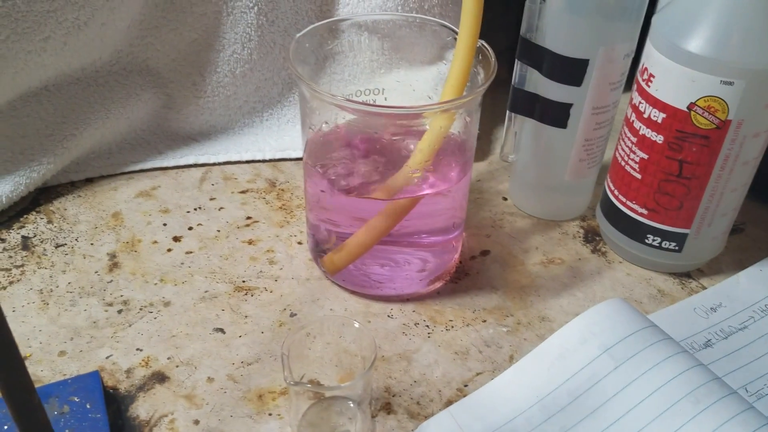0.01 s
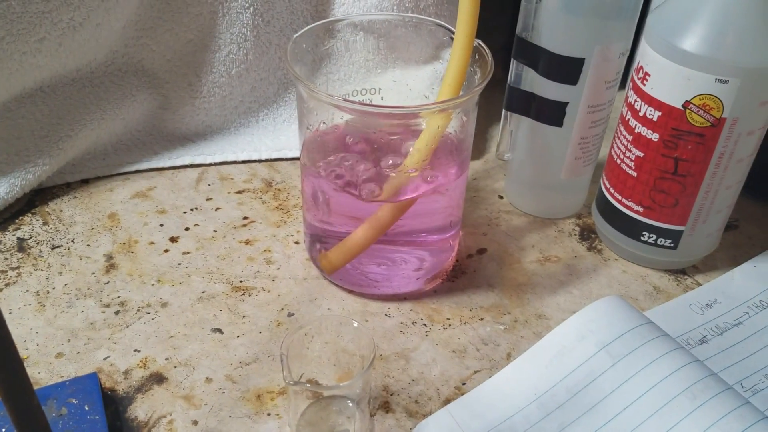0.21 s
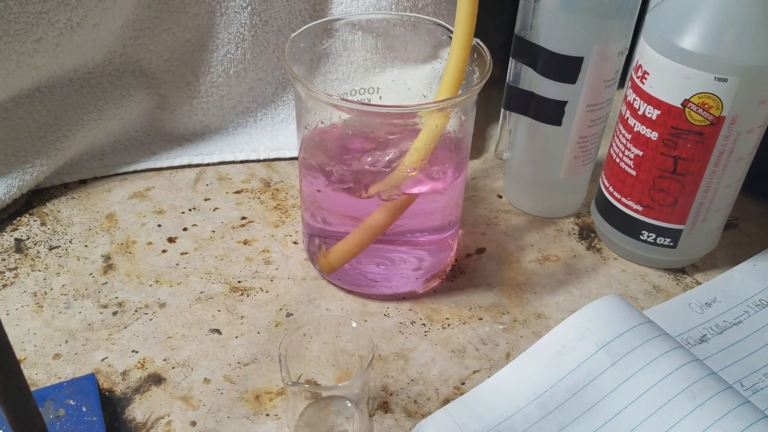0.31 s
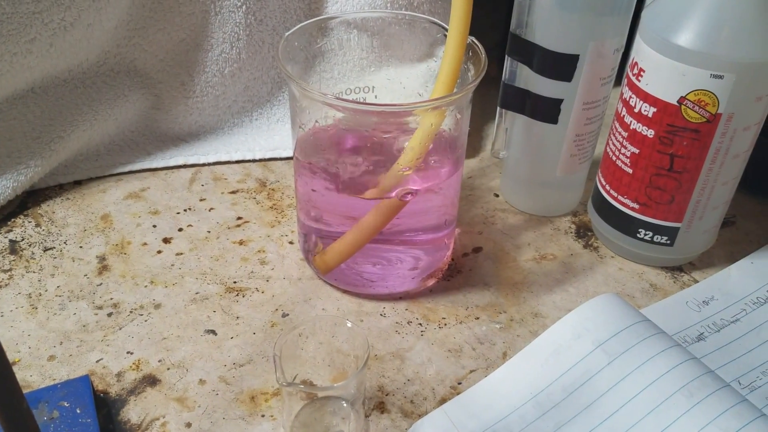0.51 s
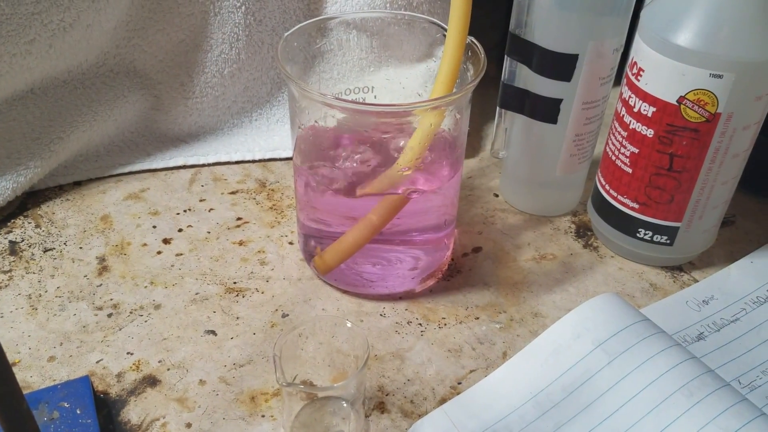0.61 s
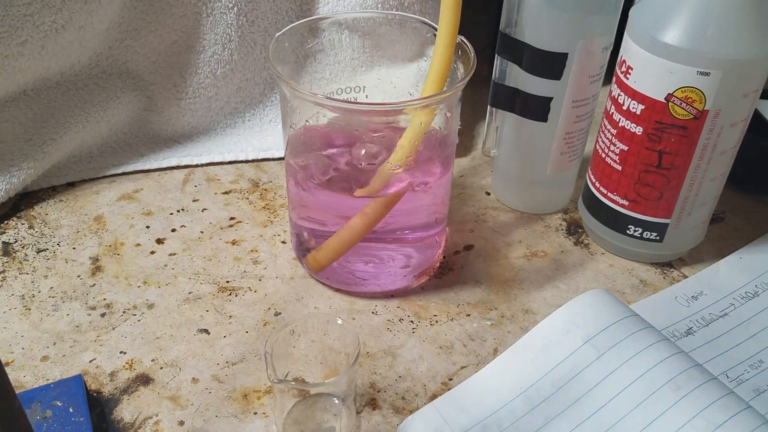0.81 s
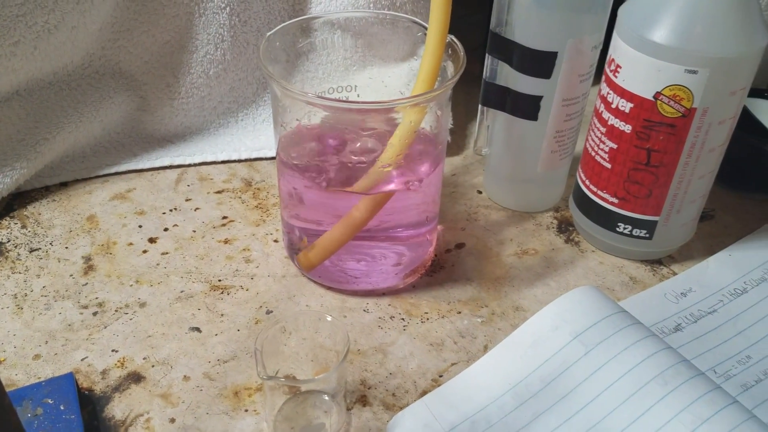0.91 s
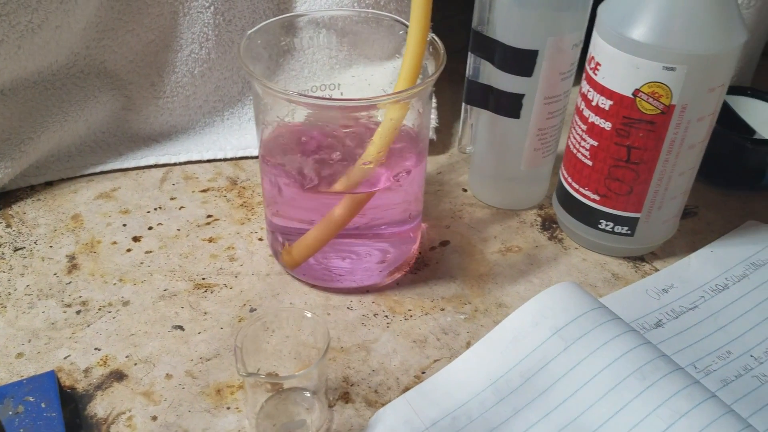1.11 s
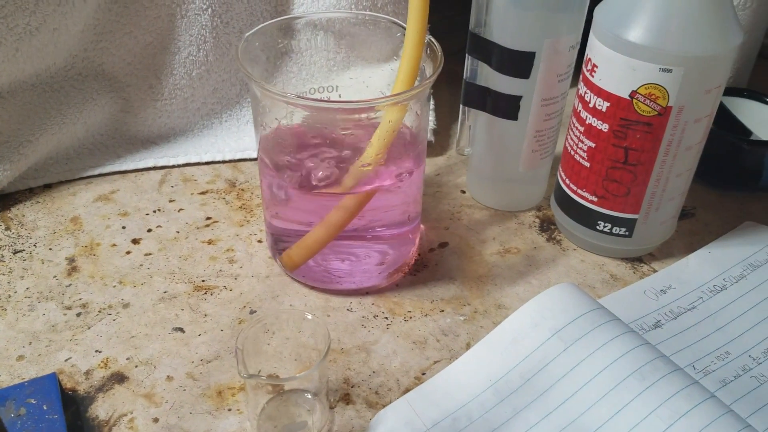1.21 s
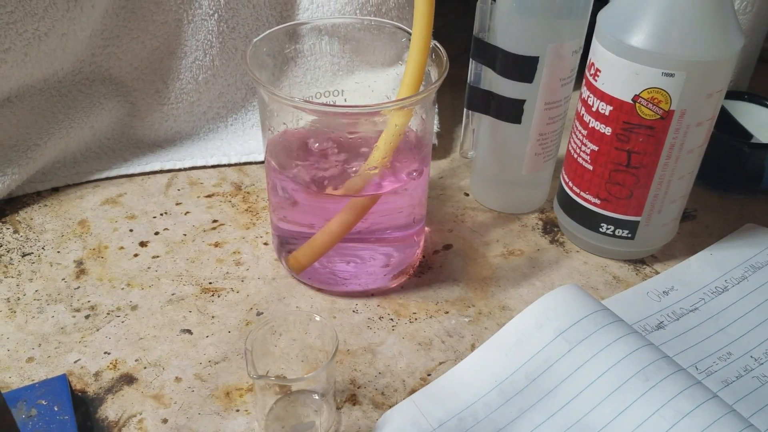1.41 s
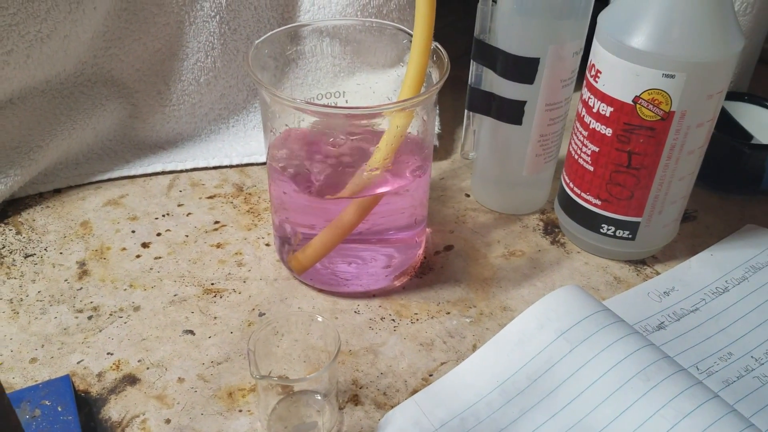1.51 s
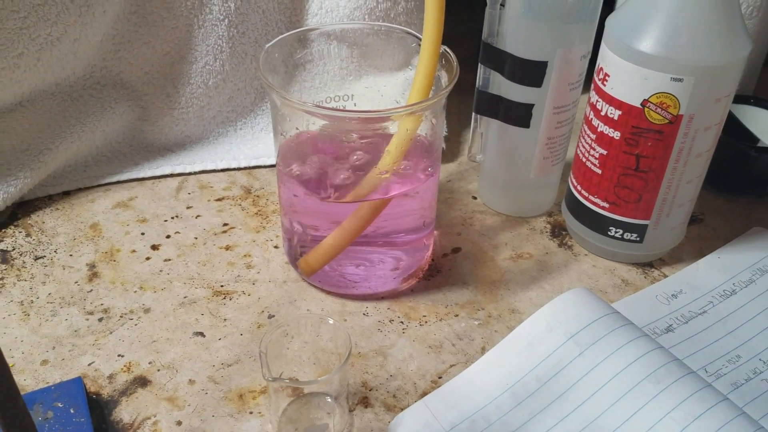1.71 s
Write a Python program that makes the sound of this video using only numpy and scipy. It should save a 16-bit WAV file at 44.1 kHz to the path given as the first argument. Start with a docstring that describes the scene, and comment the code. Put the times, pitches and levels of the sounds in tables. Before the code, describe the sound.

Bubbles blub rapidly and irregularly through liquid in a glass beaker, small and low with rising pitch. A loud knock on the bench comes early, then fainter bumps and crisp ticks; close stereo microphones, small quiet lab.

```python
"""Gas bubbles through liquid in a glass beaker: each leaves a rubber tube as a damped sine of rising pitch,
with a splash of noise and an answering beaker tone; some bubbles reach the surface as short upward sweeps.
Films burst as narrow-band noise ticks and foam collapses in grainy noise. Knocks on the bench, softer
later, sum damped modes, a thud and noise. A soft noise rush fades within the first second, leaving the
faint low-heavy air noise of a small lab."""
import sys
import numpy as np
from scipy import signal
from scipy.fft import rfft, irfft, next_fast_len
from scipy.io import wavfile
from scipy.ndimage import uniform_filter1d

SR = 44100
rng = np.random.default_rng(int(sys.argv[2]) if len(sys.argv) > 2 else 0)


def transcribe(signal):
    """Save signal, clipped to [-1, 1], as a 16-bit WAV file at the path in sys.argv[1]."""
    frames = np.atleast_2d(signal).T
    limited = np.clip(frames, -1, 1)
    pcm = np.round(limited * 32767).astype(np.int16)
    wavfile.write(sys.argv[1], SR, pcm)


N = 79380  # samples, 1.8 s
T = np.arange(N) / SR  # s


def amp(db):
    """Level to amplitude: 20 dB is a factor of ten."""
    return 10 ** (np.asarray(db) / 20)


def unit(x):
    """Normalisation to an rms of 1."""
    return x / np.sqrt(np.mean(x ** 2) + 1e-20)


def along(points, hz):
    """Interpolation of (f/Hz, value) points on a logarithmic frequency axis."""
    f, v = np.transpose(points)
    return np.interp(np.log(hz + 1), np.log(f + 1), v)


def filtered(x, response):
    """Linear filtering: the spectrum of x times a response of frequency."""
    padded = next_fast_len(N + SR // 2)
    hz = np.fft.rfftfreq(padded, 1 / SR)
    return irfft(rfft(x, padded) * response(hz), padded)[..., :N]


def noise(spectrum):
    """Stereo noise of rms 1, shaped by a spectrum; the mid-side ratio sets the channel correlation."""
    # Correlation of left and right: f/Hz, coefficient (-1 to 1)
    alike = [(60, 0.53), (200, 0.74), (500, 0.9), (1000, 0.042), (2000, -0.13), (4000, -0.069),
             (10000, 0.014)]

    def mid_side_response(hz):
        angle = np.arccos(np.clip(along(alike, hz), -1, 1)) / 2
        return amp(along(spectrum, hz)) * [np.cos(angle), np.sin(angle)]

    mid, side = filtered(rng.standard_normal((2, N)), mid_side_response)
    return unit(np.array([mid + side, mid - side]))


def since(s):
    """Time elapsed since s in seconds, zero before."""
    return np.maximum(T - s, 0)


def fade(s, rise, t60, hold=0):
    """Exponential onset at s and exponential decay, 60 dB per t60, that begins after the hold."""
    onset = 1 - np.exp(-since(s) / rise)
    decay = np.exp(-np.log(1000) * since(s + hold) / t60)
    return onset * decay


def room(x, wet_db):
    """Reverberation: the sound plus its convolution with a fresh, frequency-dependent noise decay."""
    # Reverberation time of the small room: f/Hz, t60/s
    room_t60 = [(150, 0.26), (500, 0.24), (3000, .22), (12000, 0.17)]
    delay_s = 0.0039  # the tail is silent up to here
    white = noise([(20, 0), (20000, 0)])[:, :SR // 3]
    hz, t, bands = signal.stft(white, SR, nperseg=256)
    decay = np.exp(-np.log(1000) * t / along(room_t60, hz)[:, None])
    tail = signal.istft(bands * decay, SR, nperseg=256)[1]
    tail = tail * (T[:tail.shape[1]] > delay_s)
    tail = tail / np.linalg.norm(tail[0])
    return x + amp(wet_db) * signal.fftconvolve(np.atleast_2d(x), tail, axes=1)[:, :N]


def placed(x, lead_s):
    """Interaural-style time difference: a mono sound at two microphones, the left one earlier by lead_s."""
    channel_sign = np.array([[1], [-1]])
    return filtered(x, lambda hz: np.exp(1j * np.pi * hz * lead_s * channel_sign))


def background():
    """Stationary broadband noise forms the lab's air; noise under a falling envelope forms the soft rush."""
    # Envelope of the rush: t/s, level/dB
    rush_level = [(0, -43), (.2, -44), (.38, -47.5), (.5, -47.5), (.58, -56), (.72, -64.5), (.9, -85)]
    # Spectral shape of the rush: f/Hz, relative level/dB
    rush_spectrum = [(60, -26), (150, -27), (240, -21), (380, -2), (600, -3.5), (900, -11.5), (1200, -5),
                     (2000, -17), (3000, -21.5), (4400, -17.5), (6000, -27), (15500, -35.5)]
    # Spectral shape of the air: f/Hz, relative level/dB
    air_spectrum = [(25, -24), (60, 2), (100, 6), (150, -9), (230, -2.5), (420, 2.5), (750, 4.5), (1100, 2),
                    (1500, -5.5), (2200, -2.5), (3300, -10), (5000, -15.5), (8000, -20), (15500, -15.5)]
    air_db = -57.5
    rush = amp(np.interp(T, *np.transpose(rush_level))) * noise(rush_spectrum)
    return rush + amp(air_db) * noise(air_spectrum)


def knocks():
    """Modal excitation: each blow rings the damped bench modes, with a low thud and contact noise."""
    # Blows on the bench: t/s, level/dB, thud level/dB, thud hold/s
    blows = [(0.2162, -23.5, -44, 0.039), (.2855, -33.5, -50.5, 0.035), (0.621, -42.5, -44.5, 0.028),
             (1.329, -46, -49.5, 0.012), (1.664, -52, -51, .025), (1.761, -52, -47.5, 0.027)]
    # Modes of the bench: f/Hz, relative level/dB, t60/s
    modes = [(168, -18.5, 0.15), (221, -2, 0.099), (291.6, -6.5, 0.071), (367.8, -2.5, .16),
             (493.7, -15.5, 0.45), (541, -14, 0.16), (614.4, -10, 0.18), (713, -12.5, 0.13),
             (781, -8, 0.076), (863, -7, 0.1), (1102, -11, .1)]
    # Spectral shape of the blow's longer noise: f/Hz, relative level/dB
    body_spectrum = [(40, -45), (130, -31), (220, -4.5), (370, -15), (450, -8), (600, -7.5), (850, -9),
                     (1300, -20), (1700, -27), (3000, -41), (8000, -66)]
    # Spectral shape of the shorter crack: f/Hz, relative level/dB
    crack_spectrum = [(100, -12), (270, -5), (850, 4), (1400, -18.5), (2100, -6.5), (3000, -25),
                      (8000, -41)]
    body_db, body_rise_s, body_t60 = -3, 0.00073, 0.13
    crack_db, crack_rise_s, crack_t60 = -1.5, 0.00037, 0.037
    thud_hz, thud_rise_s, thud_t60 = 108, .014, .06
    bench_rise_s, lead_s, wet_db = 0.0036, 0.000084, -7

    rings, contact = np.zeros(N), np.zeros((2, N))
    body_noise, crack_noise = noise(body_spectrum), noise(crack_spectrum)
    for s, db, thud_db, thud_hold_s in blows:
        for k, (hz, mode_db, t60) in enumerate(modes):
            mode = np.sin(2 * np.pi * hz * since(s)) * fade(s, bench_rise_s, t60)
            rings += (-1) ** k * amp(db) * amp(mode_db) * mode  # neighbours in opposite phase
        thud = np.sin(2 * np.pi * thud_hz * since(s)) * fade(s, thud_rise_s, thud_t60, thud_hold_s)
        rings += amp(thud_db) * thud
        body = amp(body_db) * body_noise * fade(s, body_rise_s, body_t60)
        crack = amp(crack_db) * crack_noise * fade(s, crack_rise_s, crack_t60)
        contact += amp(db) * (body + crack)
    return room(placed(rings, lead_s) + contact, wet_db)


def spatters(grain_db=3.5):
    """Random superposition: foam collapses in noise sprays whose level fluctuates by grain_db rms."""
    # Sprays of collapsing foam: t/s, level/dB, rise/s, t60/s
    sprays = [(0.621, -48.5, .001, .05), (.645, -55, 0.0031, 0.2), (.89, -54.5, 0.0039, 0.14),
              (.974, -43, 0.0018, 0.027), (1.28, -41.5, 0.038, 0.16), (1.329, -55, 0.0028, 0.17),
              (1.53, -53, 0.0011, 0.06), (1.567, -56.5, 0.0047, 0.18), (1.65, -37, 0.0092, 0.062),
              (1.770, -38, 0.00088, 0.019)]
    # Spectral shape of the sprays: f/Hz, relative level/dB
    spray_spectrum = [(300, -1), (900, -1), (2200, 1.5), (3300, -7.5), (4500, -8.5), (7000, -13),
                      (15000, -14.5)]
    level = sum(amp(db) * fade(s, rise, t60) for s, db, rise, t60 in sprays)
    flicker = unit(uniform_filter1d(rng.standard_normal(N), size=40))  # averaged over 0.9 ms
    grains = unit(amp(grain_db * flicker))
    return room(level * grains * noise(spray_spectrum), wet_db=-5)


def ticks():
    """Impulsive resonance: each bursting film is narrow-band noise that decays within milliseconds."""
    # Bursting films: t/s, f/Hz, level/dB, t60/s, left-right level difference/dB
    films = [(0.459, 8200, -52, .015, -4), (0.6227, 7300, -54, 0.0098, 6.5), (0.71, 11400, -57, 0.016, -4),
             (0.8231, 10760, -37.5, 0.013, 4.5), (.9735, 15200, -62, 0.0071, 12),
             (1.134, 12300, -53, .01, -1), (1.189, 8620, -53.5, 0.012, 1.5), (1.439, 9860, -54, 0.048, 2),
             (1.489, 12600, -66, 0.0057, -3), (1.533, 13700, -38.5, 0.0099, 12.5),
             (1.566, 3030, -55, 0.067, 4), (1.6486, 12900, -50.5, .035, 13),
             (1.6816, 9790, -52, 0.0092, -4), (1.7, 11200, -46.5, 0.013, 1),
             (1.7569, 12000, -49, 0.012, 10), (1.7685, 7400, -51, 0.011, -4), (1.784, 5450, -51, .012, 4)]
    width, rise_s, wet_db = 0.19, .0004, -8  # width as a fraction of the centre frequency
    out = np.zeros((2, N))
    for s, hz, db, t60, pan_db in films:
        white = rng.standard_normal((2, N))
        ring = unit(filtered(white, lambda f: (1 + ((f / hz - 1) / width) ** 2) ** -1.5))
        pan = amp([[pan_db / 2], [-pan_db / 2]])
        out += amp(db) * pan * ring * fade(s, rise_s, t60)
    return room(out, wet_db)


def chirps():
    """Frequency modulation: a bubble nearing the surface swells, sweeps upward and stops."""
    # Bubbles reaching the surface: t/s, starting f/Hz, level/dB, length/s
    surfacing = [(.528, 771, -49, 0.033), (.722, 682, -49, 0.024), (0.922, 672, -57, .022),
                 (1.324, 635, -46, 0.014), (1.561, 703, -46.5, 0.026)]
    sweep_octaves, wet_db = 0.598, -9
    out = np.zeros(N)
    for s, hz, db, length in surfacing:
        way = np.minimum(since(s) / length, 1)  # 0 to 1 through the sweep
        pitch = hz * 2 ** (sweep_octaves * way)
        phase = 2 * np.pi * np.cumsum(pitch * (T > s)) / SR
        out += amp(db) * np.sin(phase) * np.sin(np.pi * way)
    return room(out, wet_db)


def bubbles():
    """Volume resonance: each bubble is a damped sine whose pitch climbs as it nears the surface."""
    # Bubbles leaving the tube: t/s, starting f/Hz, level/dB, t60/s, rise/(octaves per s) during one t60
    releases = [(.02, 396, -45, 0.041, 3.4), (.065, 522, -44.5, 0.033, 1.5),
                (.120, 400.5, -41.5, 0.053, 2.3), (.192, 380, -38.5, 0.13, 1.1),
                (.238, 298.5, -23.5, 0.037, 2), (.246, 552, -28, 0.021, 2), (0.307, 296, -43, 0.034, 2.5),
                (.338, 353, -39, 0.074, 2), (0.408, 442, -44.5, 0.045, 1.9), (.424, 408, -44.5, 0.082, 1.5),
                (.453, 408, -41.5, 0.047, 2), (0.51, 488, -39.5, 0.066, 1.5), (.598, 489, -41, 0.037, 2.5),
                (.643, 383, -44.5, 0.11, 0.94), (0.698, 498, -39.5, 0.077, 3.3),
                (0.7885, 460, -39.5, 0.011, 1.8), (0.801, 442, -54.5, 0.021, 4.1),
                (0.823, 371, -49.5, .06, 0.9), (0.8804, 474, -41.5, 0.018, 1.8),
                (0.886, 489, -42.5, .06, 2.3), (.922, 477, -49, 0.017, 6.2), (.982, 387, -47, 0.017, 1.4),
                (1.017, 386, -43, .04, 2), (1.038, 369, -44.5, 0.089, 2.3), (1.068, 530, -43.5, 0.079, 2.4),
                (1.184, 411, -47.5, 0.029, 2), (1.200, 407, -46.5, 0.097, 2.8),
                (1.247, 384, -46, 0.051, 1.3), (1.273, 368, -50, 0.02, 2), (1.375, 435, -43, 0.033, 1.6),
                (1.394, 380, -48, 0.043, 2.3), (1.440, 359, -47.5, 0.14, 0.67),
                (1.556, 386, -47.5, 0.028, 1.1), (1.584, 377, -43, 0.065, 0.97),
                (1.628, 356, -47, 0.12, 1.4), (1.740, 431, -48, .06, 2.4), (1.756, 414, -44.5, 0.04, 2),
                (1.786, 377, -47, 0.067, 1.7)]
    # Spectral shape of the splash as a bubble pinches off: f/Hz, relative level/dB
    pinch_spectrum = [(100, -48), (170, -24), (250, -18), (320, -9), (450, -6), (750, -15), (1300, -24),
                      (3000, -49), (8000, -57)]
    attack_s, hold_s, lead_s, wet_db = 0.0013, 0.007, 0.00034, -7
    pinch_db, pinch_t60 = -9.5, 0.086
    beaker_hz, beaker_db, beaker_t60 = 253.9, -9, 0.12  # the filled beaker answers each bubble
    wall_s, wall_db = 0.00763, -17.5  # reflection from the backdrop behind the beaker

    out, splash_level = np.zeros((2, N)), np.zeros(N)
    for s, hz, db, t60, rise in releases:
        pitch = hz * 2 ** (rise * np.minimum(since(s), t60))
        phase = 2 * np.pi * np.cumsum(pitch * (T > s)) / SR
        ring = np.sin(phase) * fade(s, attack_s, t60, hold_s)
        beaker = np.sin(2 * np.pi * beaker_hz * since(s)) * fade(s, attack_s, beaker_t60)
        direct = amp(db) * (ring + amp(beaker_db) * beaker)
        wall = amp(wall_db) * filtered(direct, lambda f: np.exp(-2j * np.pi * f * wall_s))
        out += room(placed(direct + wall, lead_s), wet_db)
        splash_level += amp(db) * fade(s, attack_s, pinch_t60)
    splash = amp(pinch_db) * splash_level * noise(pinch_spectrum)
    return out + room(splash, wet_db)


def scene():
    """Superposition of all sources; a level difference between channels leans all but the ticks mostly left."""
    # Stereo balance: f/Hz, left-right level difference/dB
    balance = [(40, 5.5), (120, 5), (300, 0.2), (600, -0.3), (1200, 1), (2500, 0.5), (5000, 2.5),
               (12000, 5)]
    mix = bubbles() + chirps() + spatters() + knocks() + background()
    half = np.array([[.5], [-.5]])
    return filtered(mix, lambda hz: amp(along(balance, hz) * half)) + ticks()


def record(dry):
    """Band limitation: an ideal low-pass removes everything from 16 kHz upward."""
    top_hz = 16000
    return filtered(dry, lambda hz: hz < top_hz)


dry = scene()
out = record(dry)
transcribe(out)
```